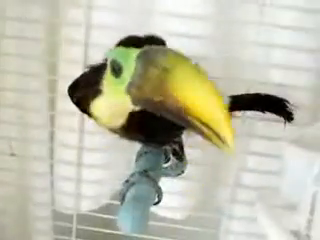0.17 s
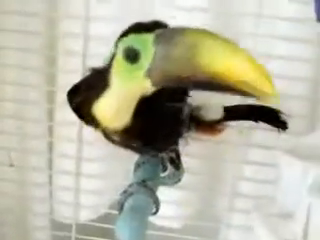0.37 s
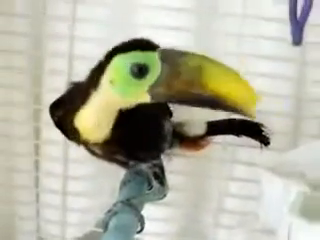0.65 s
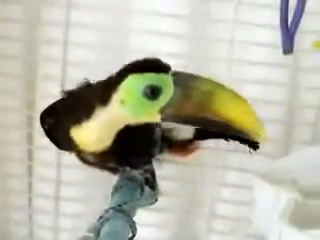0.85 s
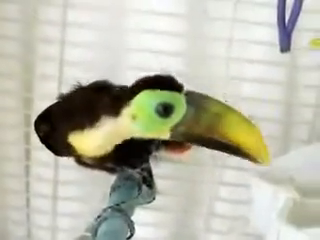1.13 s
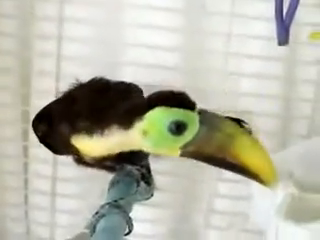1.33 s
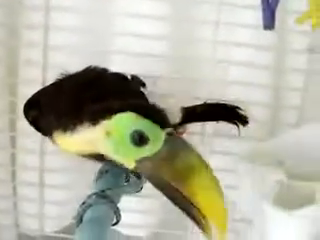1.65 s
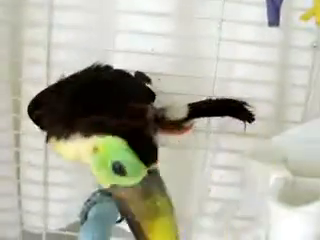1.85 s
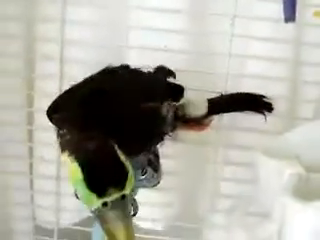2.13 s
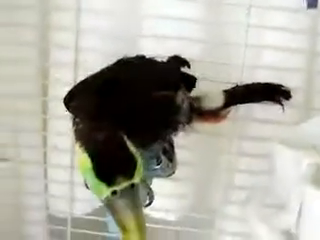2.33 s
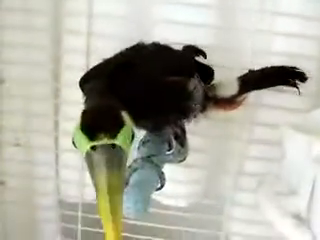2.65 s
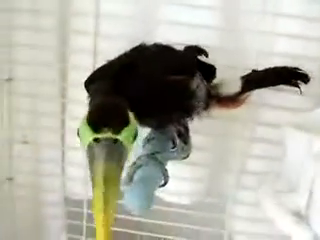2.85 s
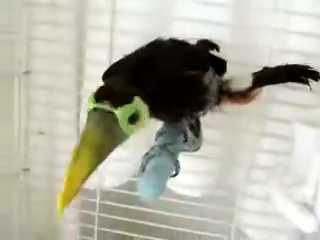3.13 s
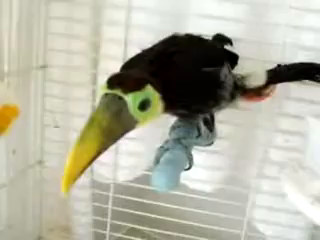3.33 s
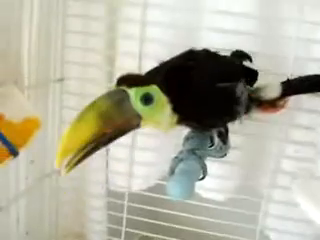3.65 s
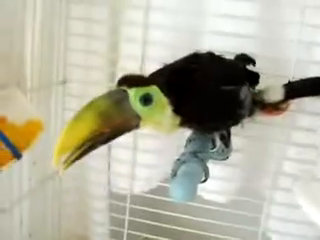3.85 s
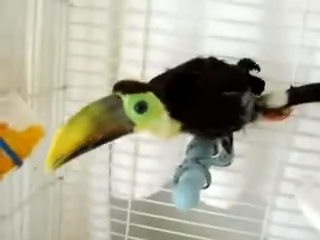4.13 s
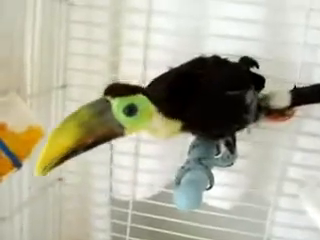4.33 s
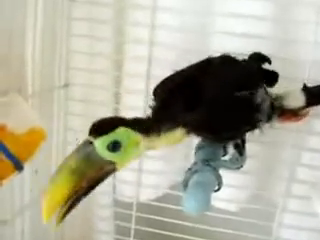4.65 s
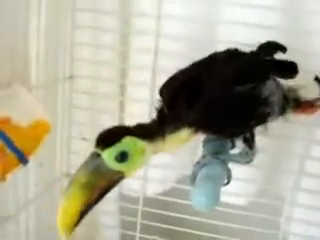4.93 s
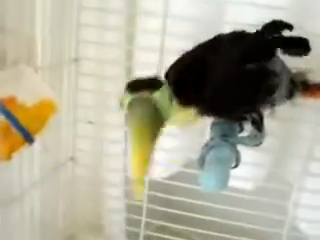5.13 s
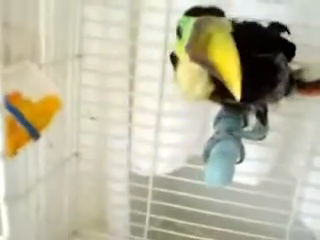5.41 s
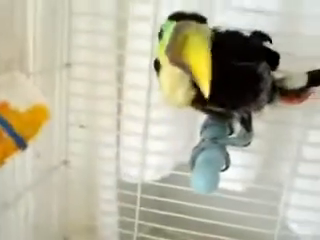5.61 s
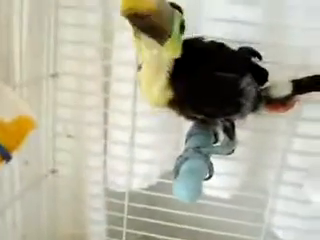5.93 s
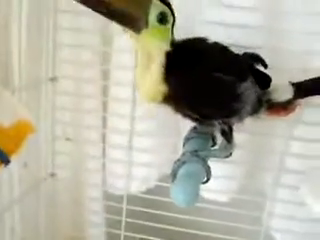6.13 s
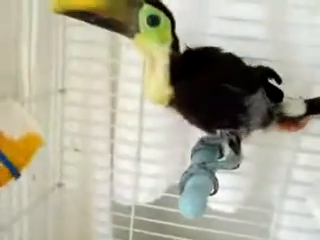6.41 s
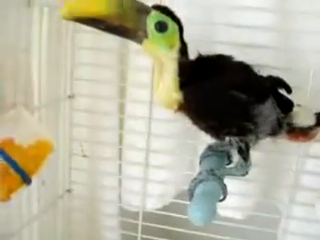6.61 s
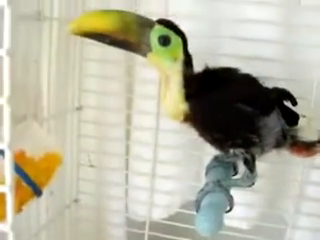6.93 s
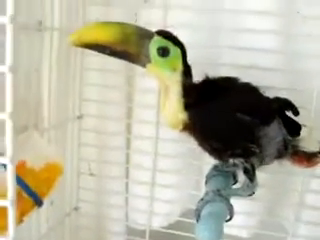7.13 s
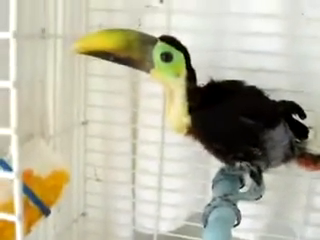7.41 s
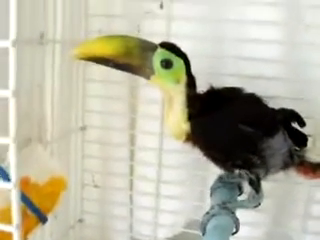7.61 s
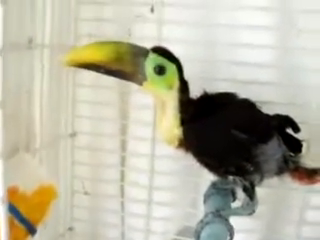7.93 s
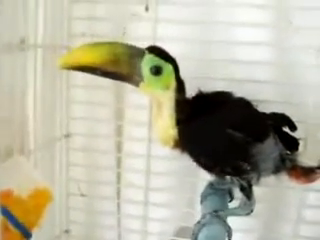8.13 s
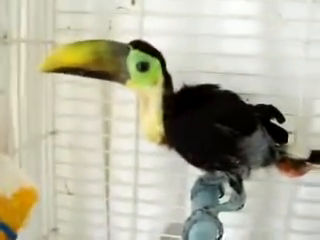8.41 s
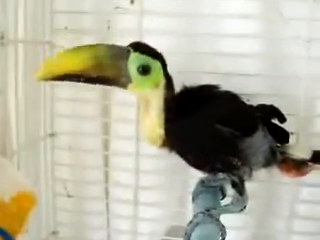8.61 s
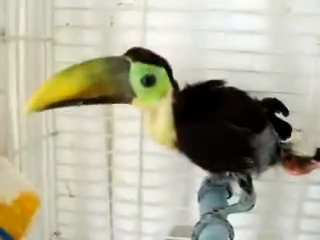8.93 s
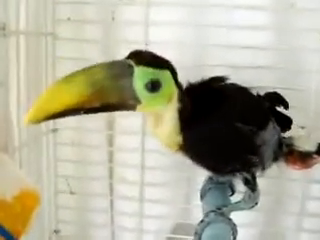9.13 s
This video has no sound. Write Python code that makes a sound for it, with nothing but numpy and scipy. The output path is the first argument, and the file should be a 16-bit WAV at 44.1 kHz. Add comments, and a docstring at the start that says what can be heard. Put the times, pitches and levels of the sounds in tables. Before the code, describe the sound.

A single toucan calls loudly near one microphone, with slight short room echo. Its nasal, reedy croaks last about a quarter second each, some cracking upward into a rattling double-toned yelp, others lower and raspier. Clicks pop at many onsets. The bout breaks off early, resumes, and runs steadily until around seven seconds. Then the bird is silent over soft rumble and faint motor hum, with tiny distant chirps.

```python
"""A toucan croaks in bouts in a small room: two syrinx halves sing in step at low pitch and slip apart
when pushed higher; their beating makes the croak. Most notes open with a click, noise-struck modes.
A motor whines faintly (wavering harmonics) over low room rumble (shaped noise); a far bird whistles
late on (bent sines). One close microphone, band-limited, feeds both channels."""
import sys
import numpy as np
from scipy import signal
from scipy.fft import rfft, irfft, next_fast_len
from scipy.io import wavfile
from scipy.ndimage import uniform_filter1d

SR = 44100
rng = np.random.default_rng(int(sys.argv[2]) if len(sys.argv) > 2 else 0)


def log_audio(samples):
    """Write samples as a 16-bit WAV file to the path given in sys.argv[1]."""
    # one column per channel
    frames = np.atleast_2d(samples).T
    # limit to full scale, then quantise
    limited = np.clip(frames, -1, 1)
    pcm = np.round(limited * 32767).astype(np.int16)
    wavfile.write(sys.argv[1], SR, pcm)


def field_ratio(decibels):
    """Amplitude ratio for a level in dB (20 dB per decade); scalars and array-likes work."""
    return 10 ** (np.asarray(decibels, dtype=float) / 20)


N = 408366

# low register, opening of each note: start_s, rise_s, then at the top of the rise
# level_db, pitch_hz, overtones_over_fundamental_db
NOTE_SWELLS = [(-0.03, .036, -14, 750, -1.5), (0.126, .022, -18.5, 870, -3), (0.556, .024, -16, 870, -3),
               (1.545, .029, -21.5, 850, -7), (1.824, 0.029, -18.5, 940, 3), (2.09, .026, -11.5, 785, 3.5),
               (2.449, .026, -12, 767, 3.5), (2.836, .048, -13.5, 749, -1.5), (3.524, 0.052, -13, 880, 6),
               (3.798, 0.037, -12, 890, 8.5), (4.058, .06, -11.5, 885, 5), (4.397, .052, -11, 865, 5.5),
               (4.729, .03, -10, 800, 1.1), (5.089, .041, -8.5, 865, 4), (5.684, .041, -9, 895, 8),
               (6.002, .028, -16, 870, 4), (6.317, .034, -12.5, 870, 9), (6.654, .054, -15, 835, 7)]
# low register, close of each note: end_s, fall_s, then where the fall begins
# level_db, pitch_hz, overtones_over_fundamental_db
NOTE_ENDINGS = [(0.038, .03, -15, 720, -1.5), (0.318, .054, -15, 835, 2.5), (0.8, .046, -16, 770, 4),
                (1.81, 0.049, -11, 836, 5), (1.996, .054, -11.5, 898, 9), (2.292, .043, -12.5, 778, 1.5),
                (2.675, .036, -15, 715, 2.5), (3.08, .06, -12.5, 749, 1.5), (3.77, 0.051, -14, 775, 1.5),
                (3.973, 0.061, -12.5, 808, 3), (4.264, .064, -13, 815, 3.5), (4.629, .057, -12, 790, -1.5),
                (4.945, .098, -10.5, 850, 0.5), (5.321, .049, -10.5, 765, 2.5),
                (5.953, .046, -13.5, 790, 5), (6.177, .045, -14, 815, 2), (6.543, 0.045, -15.5, 728, 3.5),
                (6.836, .064, -15, 765, 6)]
# voice of each note: slip_between_halves_hz, hoarseness_0_to_1, treble_db (beak turn),
# gape_tilt_db_per_octave (about 2600 Hz)
NOTE_VOICING = [(50, 0.37, 13, -7), (49.3, .2, 5, -2.5), (57.7, 0.16, 1.4, 0), (49.9, 0.15, 2.5, -1),
                (62.9, 0.34, 2.5, 5.5), (49.6, 0.22, 3.5, 6), (50, 0.63, 2.5, 6.5), (50, 0.11, 2.5, 4),
                (41.2, 0.22, 2, 6), (37.7, 0.25, -0.2, 5.5), (45, 0.27, 3.8, -0.5), (45.4, 0.26, 4.5, 3),
                (47.4, 0.3, 0.5, 4.5), (36.3, 0.24, 7.5, 4), (32.5, 0.22, 9.5, -2), (60.2, 0.2, 6, -3.5),
                (50.3, 0.24, 7, -6), (39.2, 0.22, 8, -2.5)]
# jumps to the high register: start_s, end_s, crest_hz, end_hz, level_db
REGISTER_BREAKS = [(.148, 0.262, 1129, 1031, -12), (0.579, 0.752, 1105, 975, -14.5),
                   (1.575, 1.759, 1175, 1017, -12), (1.854, 1.937, 1160, 1140, -14),
                   (2.159, 2.18, 1160, 1140, -12.5), (3.572, 3.719, 1123, 921, -14),
                   (3.836, 3.912, 1096, 1061, -16.5), (4.119, 4.161, 1089, 1075, -17.5),
                   (4.186, 4.198, 1020, 960, -18), (4.448, 4.571, 1126, 1083, -17.5),
                   (4.763, 4.81, 1030, 1120, -16.5), (4.827, 4.845, 1050, 980, -16.5),
                   (5.132, 5.269, 1150, 1058, -12), (5.725, 5.904, 1104, 1035, -13.5),
                   (6.03, 6.129, 1100, 1040, -14.5), (6.351, 6.495, 1091, 896, -15),
                   (6.707, 6.77, 1030, 935, -17)]
# colour of each break: climb_s, crest_overtones_db, level_change_db, sag_exponent (1 steady, 6 late)
BREAK_COLOURS = [(.016, 6.5, -2, 5), (0.011, 2.5, -1.5, 6), (.04, 6.5, -1.5, 4), (.018, -2.5, 1.5, 3),
                 (.004, 6, -3, 3), (.004, 0, -1, 4), (.006, 0.5, -3, 2.1), (.005, -1.5, -7, 2.1),
                 (.004, 0.5, 0.5, 1.1), (.004, 0.5, -2.5, 1.5), (0.0065, 3, 2, 3), (.004, 5, -8, 1.5),
                 (.004, -1.5, -2.5, 2.1), (.005, -3, -1.5, 3), (0.0049, 0.5, -2.5, 3),
                 (0.00494, 1.5, -3, 2.2), (.004, -4.5, -3, .5)]
# rasps, cycles grouped in threes and sixes: start_s, end_s, sixes_rad, threes_rad, wander_rad
RASP_SPANS = [(1.955, 1.99, .1, .25, .2), (2.112, 2.25, .14, .3, .24), (2.475, 2.635, .2, .25, .32),
              (4.77, 4.845, .05, .1, .22)]
# windpipe and beak response, for the overtones: freq_hz, gain_db
THROAT_RESPONSE = [(800, -31), (1300, -4), (1850, -4.5), (2250, 0), (2700, 0), (3250, -4.5), (3900, -16),
                   (4450, -13), (5000, -17), (5600, -18), (7500, -38), (10500, -41.5)]
# clicks that open notes: time_s, level_db
CLICK_TIMES = [(0.1208, -10.5), (0.5462, -19), (1.5366, -14.5), (2.084, -26), (2.437, -20.5), (3.5215, -17),
               (3.797, -19.5), (4.057, -18), (4.3924, -18.5), (5.081, -18), (5.674, -22), (5.9966, -12.5),
               (6.311, -27), (6.6434, -17.5)]
# modes a click rings: freq_hz, level_db, t60_s
CLICK_RESONANCES = [(692, -5.5, 0.039), (1780, 1.5, 0.0064), (2320, -2.5, 0.013), (3120, -13.5, 0.0089),
                    (4900, -24, 0.014)]
# relative spectrum of the room noise: freq_hz, density_db_per_hz
RUMBLE_SPECTRUM = [(25, -24.5), (56, -4.5), (78, -14), (102, 1.5), (150, -15), (280, -5), (378, -2),
                   (532, -11.5), (1100, -15), (1700, -22.5), (3000, -29), (9730, -40.5), (10500, -47)]
# wandering background levels: time_s, noise_db, whine_db
BACKGROUND_LEVELS = [(0, -33.5, -52), (.7, -32, -43.5), (1.4, -32, -39.5), (2.1, -32, -45.5),
                     (2.6, -36, -45.5), (3.4, -33, -46), (4.3, -32.5, -47), (6.4, -30.5, -46.5),
                     (8.0, -32, -45.5), (9.26, -32, -42.5)]
# motor harmonics: multiple, relative_level_db
WHINE_HARMONICS = [(5, 2), (6, -1.5), (7, -4.5), (8, -8), (11, -13)]
# far bird: start_s, length_s, pitch_hz, level_db
WHISTLES = [(7.18, .11, 4300, -53), (7.25, .06, 9200, -57), (7.5, 0.17, 4400, -55), (8.31, .09, 4480, -54),
            (8.94, .12, 4450, -48)]
# bands of faint left-right difference that follows the sound: low_hz, high_hz, level_db
SIDE_BANDS = [(2060, 2920, -17.5), (6880, 8600, -13.5)]

UNLOCK_HZ = 875  # above this pitch the halves slip apart
SLACK_HZ = 622.2  # pitch at the very edges of a note
RISE_BEND, FALL_BEND = .85, 1.05  # exponents of the pitch ramps
# level deficit at each edge; its time constant is S + SHARE * ramp time
ATTACK_DB, ATTACK_S, ATTACK_SHARE = -26, .003, .11
RELEASE_DB, RELEASE_S, RELEASE_SHARE = -28, .005, .07
DULL_DB_PER_HZ, SAG_DULL_DB_PER_HZ = .052, .045  # slacker membranes lose overtones
SOFT_DB_PER_HZ, BREAK_ARCH_DB = .007, 1.5  # and some level; a break swells in its middle
DROP_S, FLAT_SHARE, SETTLE_S = .0055, .018, .02  # fall out of a break; flat start, then settling
TREBLE_HZ, CUTOFF_HZ = 3800, 10200
ROOM_T60_S, ROOM_DB = .32, -18
ROOM_LOW_CUT_HZ = 800  # the echo carries little of the fundamental
WHINE_HZ = 174.3


def rms_one(x):
    """Scale to rms 1."""
    return x / np.sqrt(np.mean(x ** 2) + 1e-20)


def at_hz(points, hz):
    """Read a spectrum on a log-frequency axis."""
    freq_hz, level_db = np.transpose(points)
    return np.interp(np.log(hz), np.log(freq_hz), level_db)


def shaped(x, gain_db_at):
    """Filter by a spectrum given as a function of Hz."""
    length = next_fast_len(len(x))
    hz = np.maximum(np.arange(length // 2 + 1) * SR / length, 10)
    return irfft(rfft(x, length) * field_ratio(gain_db_at(hz)), length)[:len(x)]


def drift(rate_hz, size):
    """Slow chance: white noise through a double one-pole low-pass, rms 1."""
    r = np.exp(-2 * np.pi * rate_hz / SR)
    warmup = 20000
    noise = rng.standard_normal(size + warmup)
    return rms_one(signal.lfilter([1], [1, -2 * r, r * r], noise)[warmup:])


def coloured_noise(points, size):
    """Noise shaped to a spectrum, rms 1."""
    return rms_one(shaped(rng.standard_normal(size), lambda hz: at_hz(points, hz)))


def controls(swell, ending):
    """Membrane tension sets pitch, level and brightness: rise, hold, fall, breaks laid over."""
    (start_s, rise_s, *top), (end_s, fall_s, *last) = swell, ending
    t = np.arange(max(start_s - .008, 0), end_s + .015, 1 / SR)
    hold_s = [start_s + rise_s, end_s - fall_s]
    level_db, held_hz, bright_db = [np.interp(t, hold_s, pair) for pair in zip(top, last)]
    rising = np.clip((t - start_s) / rise_s, 0, 1) ** RISE_BEND
    falling = np.clip((end_s - t) / fall_s, 0, 1) ** FALL_BEND
    pitch_hz = SLACK_HZ + (held_hz - SLACK_HZ) * rising * falling
    slack_hz = held_hz - pitch_hz
    bright_db = bright_db - DULL_DB_PER_HZ * slack_hz
    attack = np.exp(-np.maximum(t - start_s, 0) / (ATTACK_S + ATTACK_SHARE * rise_s))
    release = np.exp(-np.maximum(end_s - t, 0) / (RELEASE_S + RELEASE_SHARE * fall_s))
    level_db = level_db - SOFT_DB_PER_HZ * slack_hz + ATTACK_DB * attack + RELEASE_DB * release
    for span, colour in zip(REGISTER_BREAKS, BREAK_COLOURS):
        up_s, down_s, crest_hz, end_hz, high_db = span
        climb_s, high_bright_db, change_db, bend = colour
        high = np.clip(np.minimum((t - up_s) / climb_s, (down_s - t) / DROP_S + .5), 0, 1)
        since_climb_s = t - up_s - climb_s
        along = np.clip(since_climb_s / (down_s - up_s - climb_s), 0, 1)
        sag_hz = (crest_hz - end_hz) * along ** bend
        flat = FLAT_SHARE * np.exp(-np.maximum(since_climb_s, 0) / SETTLE_S)
        arch_db = BREAK_ARCH_DB * (np.sin(np.pi * along) - .5)
        # crossfade from the low register to the high
        pitch_hz = pitch_hz + high * (crest_hz * (1 - flat) - sag_hz - pitch_hz)
        level_db = level_db + high * (high_db + change_db * (along - .5) + arch_db - level_db)
        bright_db = bright_db + high * (high_bright_db - SAG_DULL_DB_PER_HZ * sag_hz - bright_db)
    return t, level_db, pitch_hz, bright_db


def note(swell, ending, slip_hz, hoarse, treble_db, gape_db):
    """Two membranes, overtones, combination tones and breath; returns first sample and sound."""
    t, level_db, pitch_hz, bright_db = controls(swell, ending)
    size = len(t)
    hoarse = np.clip(hoarse, 0, 1)
    apart = np.clip((pitch_hz - UNLOCK_HZ) / 30, 0, 1)
    cycle = 2 * np.pi * np.cumsum(pitch_hz) / SR
    beat = 2 * np.pi * np.cumsum(slip_hz * apart * (1 + .11 * drift(17.6, size))) / SR
    # apart, the voice is hoarser and the halves tug at each other once a beat
    shake = hoarse * (.61 + .63 * apart) * (1.37 * drift(68, size) + .41 * drift(270, size))
    upper = cycle + shake + .086 * apart * np.sin(beat)
    lower = cycle - beat + shake + hoarse * .91 * drift(89, size) - .07 * np.sin(beat)
    pulse, pressed = 1, apart
    for rasp_start_s, rasp_end_s, sixes, threes, wander in RASP_SPANS:
        on = np.clip(np.minimum(t - rasp_start_s, rasp_end_s - t) / .004, 0, 1)
        if on.any():  # uneven groups of cycles put lines between the overtones
            group = cycle / 6 + 1.2 * drift(25, size)
            uneven = sixes * np.sin(group) + threes * np.sin(2 * group) + wander * drift(250, size)
            upper += on * uneven
            pulse = 1 + 2 * sixes * on * np.cos(group)  # the voice throbs once a group
            pressed = np.maximum(apart, on)
    second = field_ratio(-1.5) * apart
    fundamental = (np.sin(upper) + second * np.sin(lower)) / np.sqrt(1 + second ** 2)
    # soft or relaxed singing is dull
    treble = field_ratio(treble_db + .46 * (level_db - level_db.max()) - 12.2 * (1 - pressed))

    def throat_db(hz):
        return at_hz(THROAT_RESPONSE, hz) + gape_db * np.clip(np.log2(hz / 2600), -.5, .5)

    # each half has its own overtones; the shared airstream adds sum tones between them
    own, mixed = .68 * second, .84 * second
    overtones, power = 0, 0
    for k in range(2, 15):
        gain = np.where(k * pitch_hz > TREBLE_HZ, treble, 1) * (k * pitch_hz < CUTOFF_HZ)
        tones = np.sin(k * upper + k) + own * np.sin(k * lower + k)
        sum_tone = mixed * np.sin((k - 1) * upper + lower)
        overtones = overtones + gain * (tones + sum_tone)
        power = power + (gain * field_ratio(throat_db(k * pitch_hz))) ** 2 * (1 + own ** 2 + mixed ** 2)
    air = rng.standard_normal(size)
    hiss = shaped(air, lambda hz: -40 * (hz < TREBLE_HZ))
    breath = hoarse * field_ratio(9.5) * (air - hiss + treble * hiss)
    overtones = shaped((overtones + breath) * field_ratio(bright_db) / np.sqrt(power / 2), throat_db)
    fundamental = shaped(np.sqrt(2) * pulse * fundamental, lambda hz: -20 * (hz < 580))
    voice = fundamental + pulse * overtones
    fade = np.clip(np.minimum((t - swell[0]) / .006 + 1, (ending[0] - t) / .011 + 1), 0, 1)
    return int(t[0] * SR), voice * fade * field_ratio(level_db) / np.sqrt(1 + field_ratio(2 * bright_db))


def clicks():
    """The syrinx pops open: impulse and air puff strike short modes, each with random strength."""
    time_s, click_db = np.transpose(CLICK_TIMES)
    spread_db = rng.normal(0, 2.5, (len(time_s), len(CLICK_RESONANCES)))
    puff = .12 * rng.standard_normal(400) * np.exp(-np.arange(400) / (.003 * SR))
    puff[0] = 1
    out = np.zeros(N)
    for k, (hz, mode_db, t60_s) in enumerate(CLICK_RESONANCES):
        pops = np.zeros(N)
        pops[(time_s * SR).astype(int)] = field_ratio(click_db + mode_db + spread_db[:, k])
        struck = signal.fftconvolve(pops, puff)[:N]
        r, w = field_ratio(-60 / (t60_s * SR)), 2 * np.pi * hz / SR
        out += signal.lfilter([0, np.sin(w)], [1, -2 * r * np.cos(w), r * r], struck)
    return out


def toucan():
    """All notes of the two-part syrinx and their clicks."""
    out = clicks()
    for swell, ending, voicing in zip(NOTE_SWELLS, NOTE_ENDINGS, NOTE_VOICING):
        first, sound = note(swell, ending, *voicing)
        out[first:first + len(sound)] += sound
    return out


def room(x):
    """Dense echoes as decaying noise, low-passed and thinned in the bass."""
    t = np.arange(int(.5 * SR)) / SR
    tail = rng.standard_normal(len(t)) * field_ratio(-60 * t / ROOM_T60_S) * (t > .004)
    tail = signal.lfilter([.5], [1, -.5], tail)
    low_cut = signal.butter(2, ROOM_LOW_CUT_HZ, "high", fs=SR, output="sos")
    tail = signal.sosfilt(low_cut, tail)
    return signal.fftconvolve(x, tail / np.sqrt(np.sum(tail ** 2)))[:N]


def background():
    """Room rumble and hiss as shaped noise, plus the wavering harmonics of a small motor."""
    time_s, *columns = np.transpose(BACKGROUND_LEVELS)
    noise_db, whine_db = [np.interp(np.arange(N) / SR, time_s, c) for c in columns]
    turn = 2 * np.pi * np.cumsum(WHINE_HZ * (1 + .0012 * drift(3.26, N))) / SR
    whine = 0
    for k, level_db in WHINE_HARMONICS:
        whine = whine + field_ratio(level_db + 2.6 * drift(13, N)) * np.sin(round(k) * turn + k)
    noise = coloured_noise(RUMBLE_SPECTRUM, N)
    return field_ratio(noise_db) * noise + np.sqrt(2) * field_ratio(whine_db) * whine


def far_bird():
    """Faint whistles: sines under half-sine envelopes, phase bent by the envelope."""
    t, out = np.arange(N) / SR, 0
    for start_s, length_s, hz, level_db in WHISTLES:
        shape = np.sin(np.pi * np.clip((t - start_s) / length_s, 0, 1))
        out = out + field_ratio(level_db) * shape * np.sin(2 * np.pi * hz * t + 2.6 * shape)
    return out


def scene():
    """The toucan, its echo, the background and the far bird, alike in both channels."""
    voice = toucan()
    mono = voice + field_ratio(ROOM_DB) * room(voice) + background() + far_bird()
    return np.tile(mono, (2, 1))


def roll_off(x):
    """The treble ends steeply here."""
    return signal.sosfilt(signal.butter(12, 10920, fs=SR, output="sos"), x)


def record(dry):
    """The top is cut, the channels differ a little in two bands, peaks clip at full scale."""
    top_cut = signal.cheby2(14, 60, CUTOFF_HZ + 500, fs=SR, output="sos")
    mix = signal.sosfilt(top_cut, dry)
    for low_hz, high_hz, level_db in SIDE_BANDS:
        band = signal.butter(4, [low_hz, high_hz], "band", fs=SR, output="sos")
        power = uniform_filter1d(signal.sosfilt(band, mix[0]) ** 2, size=1500)
        strength = np.sqrt(power + 1e-14)
        noise = rms_one(signal.sosfilt(band, rng.standard_normal(N)))
        mix = mix + field_ratio(level_db) * strength * noise * [[1], [-1]]  # opposite sign left and right
    return roll_off(np.clip(mix, -1, 1))


dry = scene()
out = record(dry)
log_audio(out)
```